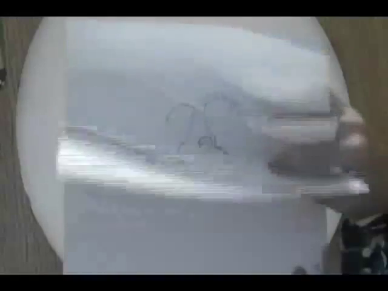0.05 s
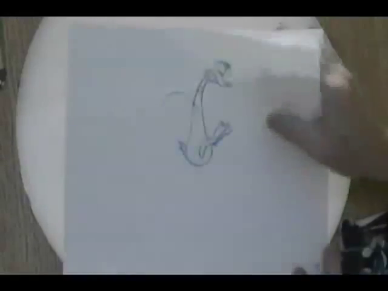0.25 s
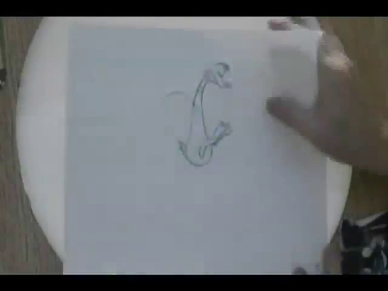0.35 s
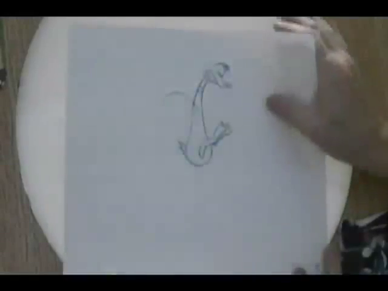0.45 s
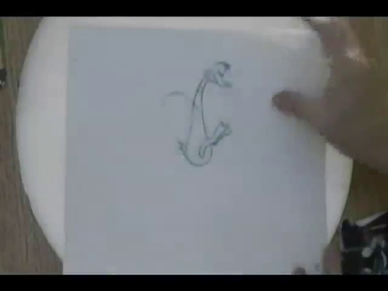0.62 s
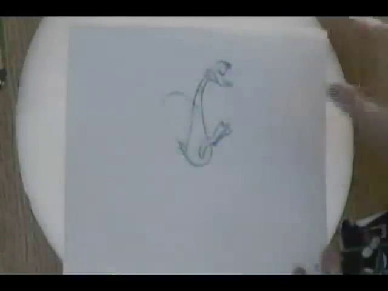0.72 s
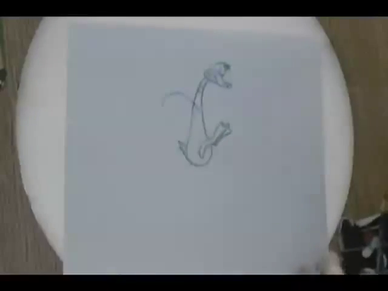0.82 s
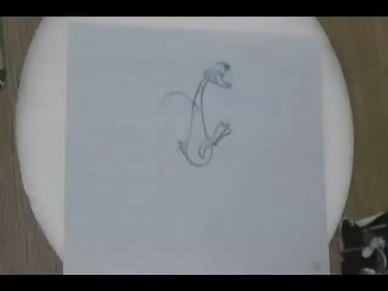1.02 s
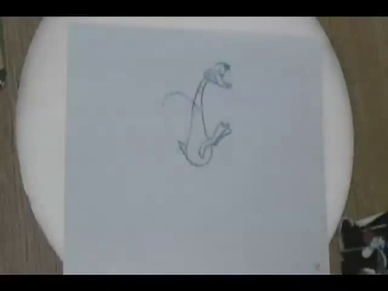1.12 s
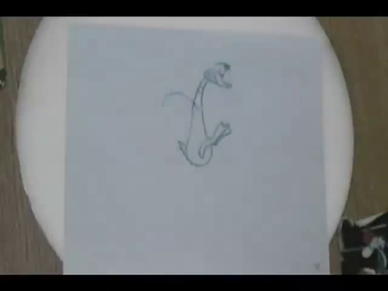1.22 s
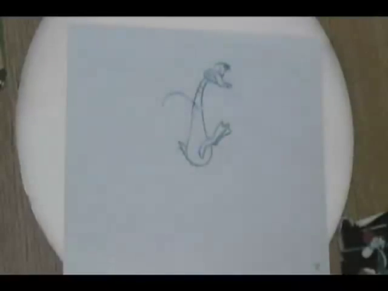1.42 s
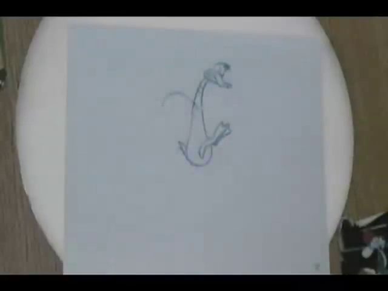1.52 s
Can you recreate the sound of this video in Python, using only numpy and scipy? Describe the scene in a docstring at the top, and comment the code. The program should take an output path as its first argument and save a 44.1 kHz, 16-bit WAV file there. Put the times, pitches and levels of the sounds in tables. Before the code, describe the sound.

Thin drawing paper slides with a soft dry rustle from the start, edges hissing around 0.25 s. Crackly flaps burst at 0.31-0.35 s, then the sheet snaps flat at 0.49 s, a loud, very short bright crack with a brief room ring. From 0.76 to 1.5 s come quiet hand brushes, small paper ticks, soft low desk bumps near 0.95 s and a faint late scuff, over steady low room rumble. Close, nearly mono.

```python
"""A desk in a small room, heard close up: a stack of thin drawing paper is rolled off the fingers.
Clumped friction noise makes the sliding sheets and hissing edges; pitched pops with crackle make the flaps.
The last sheet snaps flat, a noise crack over short modes, and a pulse sets the room ringing.
Then the hand brushes about in short strokes of friction and bumps the desk softly with low swings.
Filtered noise lays a low room rumble under everything."""
import sys
import numpy as np
from scipy import signal
from scipy.fft import rfft, irfft
from scipy.io import wavfile

SR = 44100
rng = np.random.default_rng(int(sys.argv[2]) if len(sys.argv) > 2 else 0)


def put_to_file(sound):
    """Save the sound as 16-bit audio at rate SR, in the file named by the first command-line argument."""
    columns = np.atleast_2d(sound).T  # one column per channel
    safe = np.clip(columns, -1, 1)
    whole_steps = np.round(safe * 32767)
    wavfile.write(sys.argv[1], SR, whole_steps.astype(np.int16))


N = 68355
TIME = np.arange(N) / SR  # seconds

# Room rumble and hiss: (frequency [Hz], relative level [dB])
FLOOR_SPECTRUM = [(15, -28), (26, -14), (38, -5), (60, 5), (78, -5), (100, 1), (160, -5.5), (250, -10.5),
                  (500, -10), (1000, -14.5), (1800, -13.5), (3000, -20.5), (5000, -23.5), (8000, -34.5),
                  (12000, -41.5), (16000, -54)]
FLOOR_DB = -42.5

# Sheets sliding over each other: (time [s], level [dB])
SLIDE_LEVEL = [(0, -37.5), (.03, -36.5), (.07, -42.5), (.18, -38.5), (.25, -36.5), (.33, -33.5), (.42, -36),
               (.46, -39.5), (.469, -27.5), (.48, -31), (.49, -22), (.53, -31), (.58, -40.5), (.62, -32.5),
               (.68, -41.5), (.76, -44.5)]
# Tone of the sliding faces: (frequency [Hz], relative level [dB])
SLIDE_SPECTRUM = [(200, -20.5), (850, -7.5), (1200, 3), (1600, 0), (2200, 0), (3500, -4.5), (5000, -11.5),
                  (8000, -19), (11000, -27.5), (16000, -36)]
# Sheet edges running off the thumb: (time [s], level [dB])
EDGE_LEVEL = [(0, -56), (.08, -58), (.11, -50.5), (.15, -56), (.225, -47), (.25, -34), (.29, -40),
              (.335, -38), (.36, -45), (.42, -54)]
# Tone of the edge hiss: (frequency [Hz], relative level [dB])
EDGE_SPECTRUM = [(1000, -28), (3000, -2.5), (6000, -2), (8000, 1.5), (9500, -8), (13000, -8), (16000, -30)]

# Sheets buckling: (start [s], level [dB], main pitch [Hz], crackle decay [s])
FLAP_EVENTS = [(0.3063, -21.5, 2860, 0.0041), (0.326, -47, 1930, .005), (.3340, -12.5, 2030, 0.0028),
               (0.3394, -8.5, 2010, 0.0037), (0.3476, -21, 1970, 0.0046), (.4235, -41, 2040, 0.0047),
               (0.469, -23.5, 2610, 0.0057), (0.476, -31, 3000, 0.0027), (0.7807, -26.5, 2510, 0.0018),
               (1.057, -33.5, 2320, 0.0021), (1.1256, -31.5, 1720, 0.0052), (1.3612, -30.5, 1870, 0.0067),
               (1.456, -34, 2370, .005)]
# Tone of the crackle, for a flap at the reference pitch: (frequency [Hz], relative level [dB])
FLAP_SPECTRUM = [(150, -35), (600, -15), (900, -18.5), (1100, 3.5), (1500, -2.5), (2000, 2), (2800, -1),
                 (3600, -3), (4600, -15.5), (8000, -28), (16000, -59)]
FLAP_REFERENCE_HZ = 2000
FLAP_RISE_S, FLAP_RING_PEAK_S = 0.0013, 0.00068
FLAP_RING_DB, FLAP_CRACKLE_DB = -4, 0

# Ringing of the taut sheet: (frequency [Hz], relative level [dB], time to fall 60 dB [s])
TAUT_SHEET_MODES = [(1125, -24, 0.09), (1205, -18, 0.042), (2110, -16, 0.017), (3000, -17, 0.0065),
                    (3820, 1.5, 0.01), (4650, 1.5, 0.0044), (5980, 4.5, 0.0028), (7330, -4, .007),
                    (9260, -7.5, 0.0052), (13000, -18, 0.0042)]
# Tone of the crack: (frequency [Hz], relative level [dB])
CRACK_SPECTRUM = [(100, -7), (400, -28), (850, -27), (1200, 11.5), (1700, -13.5), (3500, 0), (7000, -5.5),
                  (11000, -11.5), (14000, -29), (16000, -12)]
# What the whole sheet radiates towards the walls: (frequency [Hz], relative level [dB])
SPREAD_SPECTRUM = [(100, -19), (350, -8.5), (950, -10.5), (1150, -8), (1600, -1), (2400, 0.5), (3500, 4.5),
                   (5000, 0), (6400, -1), (9000, -11), (11000, -15), (14500, -22), (16000, -31)]
SNAP_START_S, CRACK_DECAY_S = .49155, 0.0022
SNAP_RING_DB, CRACK_DB, SPREAD_DB = -4, -12, 13

# Hand brushing past paper and desk:
# (start [s], rise [s], hold [s], decay [s], level [dB], treble tilt [dB per octave])
BRUSH_STROKES = [(0.76, 0.017, .008, 0.027, -41.5, 0.5), (0.864, 0.0088, 0.027, 0.03, -38.5, 3),
                 (1.033, .01, .025, 0.018, -41.5, 1.5), (1.097, .015, 0.022, 0.017, -41, 0.5),
                 (1.236, .004, 0.021, 0.016, -43, -1.5), (1.2494, 0.0015, 0.0073, 0.03, -31.5, 7),
                 (1.359, 0.0025, 0.0095, 0.057, -37, -0.5), (1.439, 0.0046, 0.0083, 0.028, -42.5, 0)]
# Tone of a stroke before its tilt: (frequency [Hz], relative level [dB])
BRUSH_SPECTRUM = [(200, -22.5), (700, -11.5), (1100, -2), (1450, 1), (1680, 4), (2000, 0.5), (2750, -0.5),
                  (3400, -5), (4200, -11), (5300, -18.5), (7600, -20), (11000, -33.5), (14500, -48),
                  (16000, -50)]
TILT_PIVOT_HZ = 2150

# Soft bumps on the desk: (start [s], level [dB], pitch [Hz])
DESK_BUMPS = [(0.929, -31, 112), (0.9426, -27.5, 138), (0.978, -31, 150), (1.003, -35.5, 170),
              (1.043, -35, 120)]
BUMP_PEAK_S = 0.0051
# Dull rubbing of the arm on the desk: (time [s], level [dB])
RUB_LEVEL = [(.9, -71), (.97, -43), (1.03, -47), (1.12, -49.5), (1.22, -56)]
# Tone of the rubbing: (frequency [Hz], relative level [dB])
RUB_SPECTRUM = [(60, -8.5), (200, 2), (450, -1.5), (750, -7), (1200, -15), (3000, -39)]
# A hollow scuff on the desk: (time [s], level [dB])
SCUFF_LEVEL = [(1.34, -61), (1.41, -54), (1.448, -40.5), (1.475, -47), (1.55, -46.5)]
# Tone of the scuff: (frequency [Hz], relative level [dB])
SCUFF_SPECTRUM = [(120, -31.5), (300, -3), (500, -5.5), (750, 1.5), (1200, -11), (3000, -39)]

# Reverberation time: (frequency [Hz], time to fall 60 dB [s])
ROOM_DECAY = [(200, 1), (800, 0.17), (2000, 0.69), (5500, 0.56), (9000, 0.47), (15000, 0.35)]
# Tone of the reflections: (frequency [Hz], level [dB])
ROOM_SPECTRUM = [(100, -13.5), (800, 8), (1300, -3), (2600, -1.5), (4000, -2), (6500, 0), (9000, -5),
                 (16000, -12)]
FIRST_ECHO_S, EARLY_DECAY_S, EARLY_DB = .0045, 0.011, -8

# Level sent to the room [dB]
SNAP_WET_DB, FLAP_WET_DB, SLIDE_WET_DB, BRUSH_WET_DB = -7.5, -11, -9, -2
# Level sent to the left-right difference of the reflections [dB]
SNAP_WIDTH_DB, FLAP_WIDTH_DB, BRUSH_WIDTH_DB, LOW_WIDTH_DB = -18.5, -25, -19.5, -23
# Off-centre direct sound, and right over left for the direct low sounds [dB]
OFF_CENTRE_DB, BASS_LEAN_DB = -19, 1.7
CUTOFF_HZ = 15650


def amp(db):
    """Turns decibels into gain."""
    return 10 ** (np.asarray(db) / 20)


def unit(x):
    """Scales to rms 1."""
    return x / np.sqrt(np.mean(x ** 2) + 1e-20)


def read(points, hz):
    """Reads a table on a log-frequency axis."""
    f, value = np.transpose(points)
    return np.interp(np.log(hz + 1), np.log(f + 1), value)


def level(points):
    """Gain over time from a level curve: the first level holds before it, -100 dB follows it."""
    s, db = np.transpose(points)
    return amp(np.interp(TIME, s, db, right=-100))


def coloured(x, points, tilt_db=0):
    """Causal, minimum-phase filter of unit power with the given spectrum, tilted per octave."""
    hz = abs(np.fft.fftfreq(4096, 1 / SR))
    octaves = np.log2(np.maximum(hz / TILT_PIVOT_HZ, .5))
    gain = unit(amp(read(points, hz) + tilt_db * octaves))
    minimum_phase = np.exp(np.conj(signal.hilbert(np.log(gain))))
    taps = np.fft.ifft(minimum_phase).real
    return signal.fftconvolve(x, taps[:len(taps) // 2])[:len(x)]


def friction(grain_db, flutter_db, flutter_hz):
    """Dense tiny slips of uneven size whose level flutters, so that they come in clumps."""
    slips, sizes, clumps = rng.standard_normal((3, N))
    slow = np.fft.rfftfreq(N, 1 / SR) < flutter_hz
    clumps = unit(irfft(rfft(clumps) * slow, N))
    slip_db = grain_db * np.clip(sizes, -2, 2) + flutter_db * clumps
    return unit(slips * amp(slip_db))


def since(start):
    """Seconds since an event began, zero before it."""
    return np.maximum(TIME - start, 0)


def swing(t, hz, peak_s):
    """A sine that swells to its peak and dies away."""
    envelope = t / peak_s * np.exp(1 - t / peak_s)
    return envelope * np.sin(2 * np.pi * hz * t)


def floor():
    """Steady rumble and hiss of the room, as filtered noise."""
    return amp(FLOOR_DB) * unit(coloured(rng.standard_normal(N), FLOOR_SPECTRUM))


def sliding():
    """Sheet rubs on sheet in tiny slips while the edges hiss off the thumb."""
    face_slips = friction(grain_db=3, flutter_db=1.5, flutter_hz=127)
    edge_slips = friction(grain_db=2, flutter_db=1.5, flutter_hz=201)
    faces = coloured(face_slips * level(SLIDE_LEVEL), SLIDE_SPECTRUM)
    edges = coloured(edge_slips * level(EDGE_LEVEL), EDGE_SPECTRUM)
    return faces + edges


def room(x):
    """Reflections off desk and walls, strongest early; the tail's decay time varies with frequency."""
    t = TIME[:SR]
    early_boost = 1 + amp(EARLY_DB) * np.exp(-t / EARLY_DECAY_S)
    taps = rng.standard_normal(SR) * (t > FIRST_ECHO_S) * early_boost
    # each band dies at its own rate
    hz, s, bands = signal.stft(taps, SR, nperseg=256)
    bands = bands * np.exp(-np.log(1000) * s / read(ROOM_DECAY, hz)[:, None])
    tail = signal.istft(bands, SR)[1]
    tail = tail / np.linalg.norm(tail)
    colour = amp(read(ROOM_SPECTRUM, np.fft.rfftfreq(len(tail), 1 / SR)))
    tail = irfft(rfft(tail) * colour)
    return signal.fftconvolve(x, tail)[:N]


def flaps():
    """Each buckle is a brief pitched pop with a burst of crackle; a higher pop has higher crackle."""
    out = np.zeros(N)
    for start, db, hz, decay in FLAP_EVENTS:
        t = since(start)
        pop = swing(t, hz, FLAP_RING_PEAK_S)
        burst = np.minimum(t / FLAP_RISE_S, 1) * np.exp(-t / decay) * rng.standard_normal(N)
        shift = np.sqrt(hz / FLAP_REFERENCE_HZ)
        colour = [(f * shift, band_db) for f, band_db in FLAP_SPECTRUM]
        crackle = coloured(burst, colour)
        out += amp(db) * (amp(FLAP_RING_DB) * pop + amp(FLAP_CRACKLE_DB) * crackle)
    return out


def snap():
    """The sheet pops taut: a noise crack and a few very short modes."""
    t = since(SNAP_START_S)
    ring = np.zeros(N)
    for hz, db, t60 in TAUT_SHEET_MODES:
        ring += amp(db) * np.exp(-np.log(1000) * t / t60) * np.sin(2 * np.pi * hz * t)
    burst = (t > 0) * np.exp(-t / CRACK_DECAY_S) * rng.standard_normal(N)
    crack = coloured(burst, CRACK_SPECTRUM)
    return amp(CRACK_DB) * crack - amp(SNAP_RING_DB) * ring


def spread():
    """The snap as the walls receive it: one broadband filtered pulse."""
    pulse = signal.unit_impulse(N, round(SNAP_START_S * SR))
    return amp(SPREAD_DB) * coloured(pulse, SPREAD_SPECTRUM)


def brushes():
    """Short strokes of friction that rise, hold and decay, each with its own treble tilt."""
    out = np.zeros(N)
    for start, rise, hold, decay, db, tilt_db in BRUSH_STROKES:
        envelope = np.minimum(since(start) / rise, 1) * np.exp(-since(start + rise + hold) / decay)
        stroke = envelope * friction(grain_db=5, flutter_db=1.0, flutter_hz=149)
        out += amp(db) * coloured(stroke, BRUSH_SPECTRUM, tilt_db)
    return out


def desk():
    """The desk top takes bumps as low damped swings, rubbing and a scuff as dull friction."""
    bumps = sum(-amp(db) * swing(since(start), hz, BUMP_PEAK_S) for start, db, hz in DESK_BUMPS)
    rub_slips = friction(grain_db=5, flutter_db=2.5, flutter_hz=60)
    scuff_slips = friction(grain_db=4.5, flutter_db=2.0, flutter_hz=59.7)
    rub = coloured(rub_slips * level(RUB_LEVEL), RUB_SPECTRUM)
    scuff = coloured(scuff_slips * level(SCUFF_LEVEL), SCUFF_SPECTRUM)
    return bumps + rub + scuff


def scene():
    """Nearly mono: reflections add width, snap and brushes sit off centre, direct lows lean right."""
    low = floor() + desk()
    slide, flapping, crack, outward, strokes = sliding(), flaps(), snap(), spread(), brushes()

    send = amp(SLIDE_WET_DB) * slide + amp(BRUSH_WET_DB) * strokes
    send = send + amp(FLAP_WET_DB) * flapping + amp(SNAP_WET_DB) * crack + outward
    mid = slide + strokes + flapping + crack + room(send)

    side_send = amp(SNAP_WIDTH_DB) * outward + amp(FLAP_WIDTH_DB) * flapping
    side_send = side_send + amp(BRUSH_WIDTH_DB) * strokes + amp(LOW_WIDTH_DB) * low
    side = room(side_send) + amp(OFF_CENTRE_DB) * (strokes + crack)

    left = mid + side + low * amp(-BASS_LEAN_DB / 2)
    right = mid - side + low * amp(BASS_LEAN_DB / 2)
    return np.array([left, right])


def record(dry):
    """The input clips peaks flat, then a steep low-pass limits the band."""
    clipped = np.clip(dry, -.93, .93)
    lowpass = signal.firwin(511, CUTOFF_HZ, window=("kaiser", 9), fs=SR)
    return signal.oaconvolve(clipped, lowpass[None], "same")


dry = scene()
out = record(dry)
put_to_file(out)
```